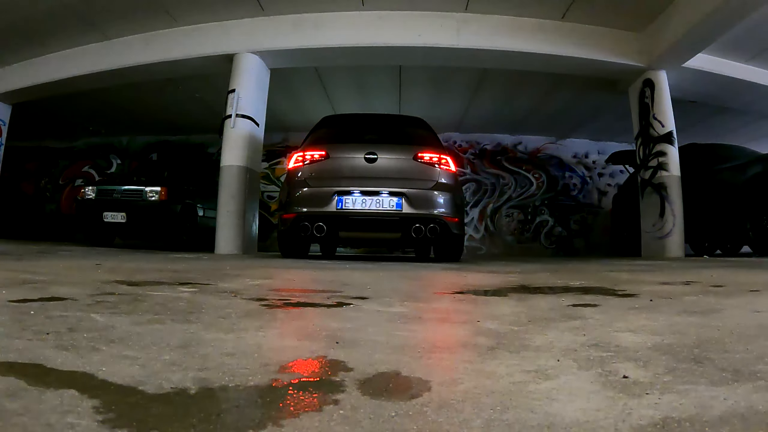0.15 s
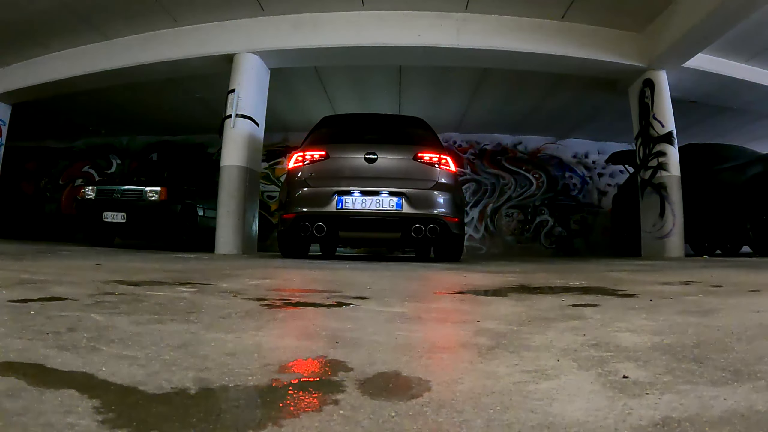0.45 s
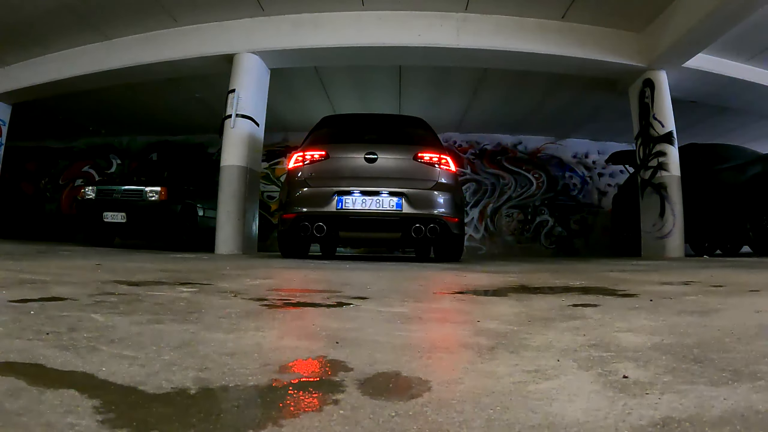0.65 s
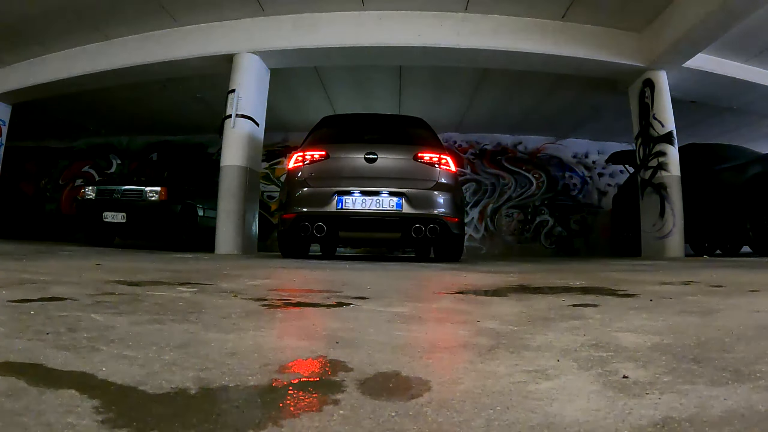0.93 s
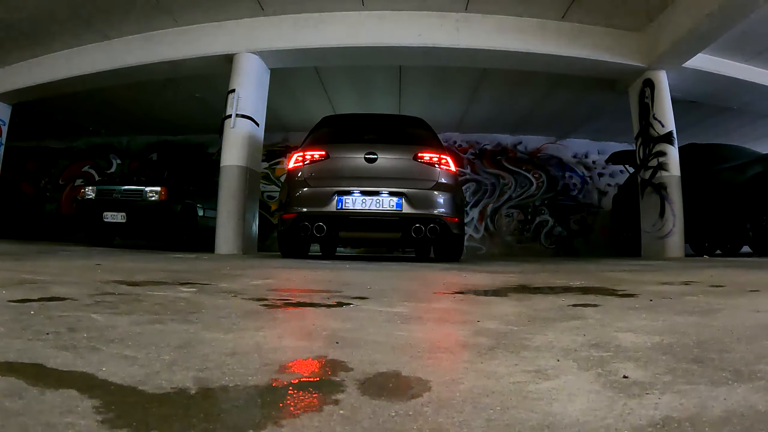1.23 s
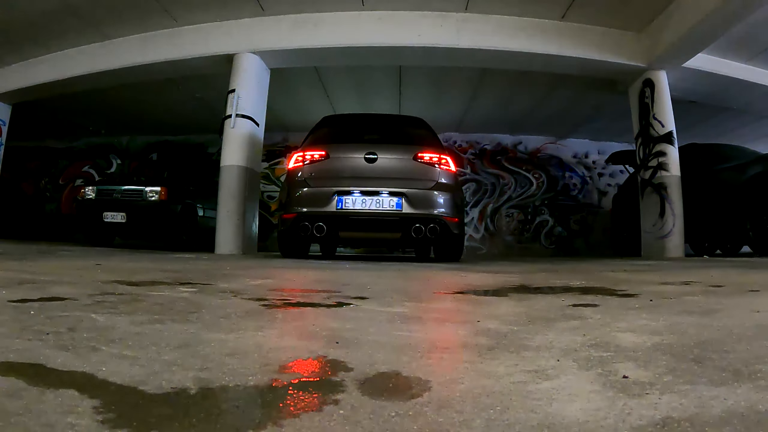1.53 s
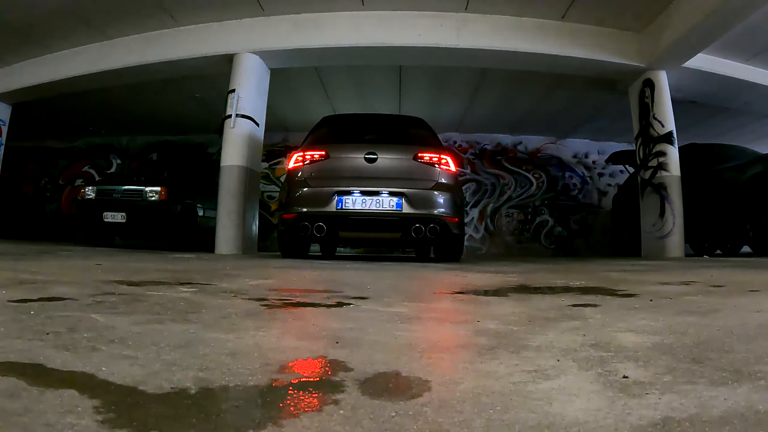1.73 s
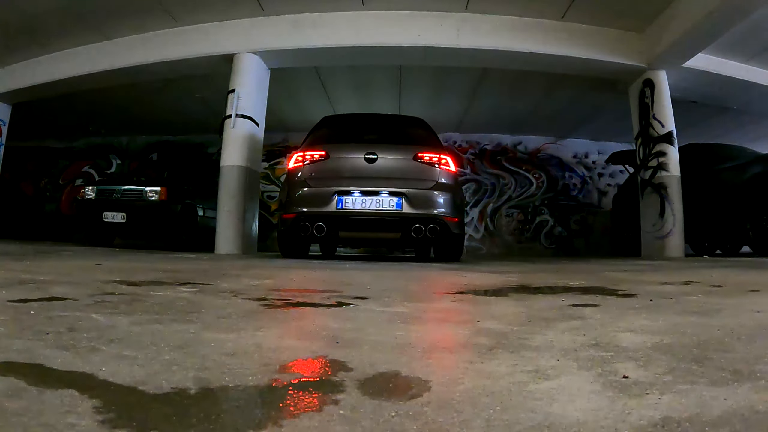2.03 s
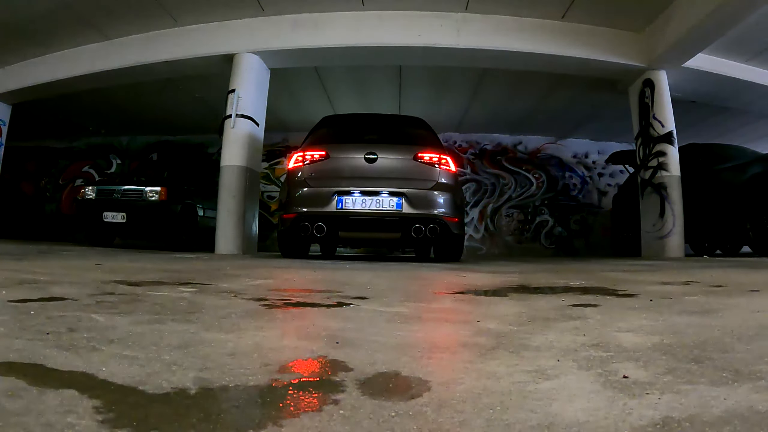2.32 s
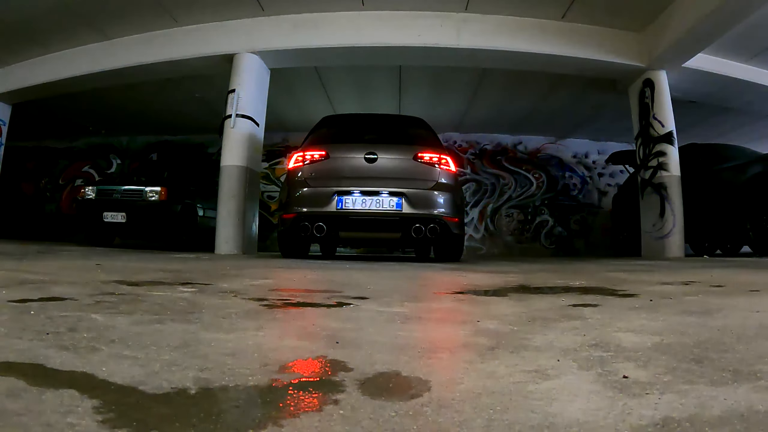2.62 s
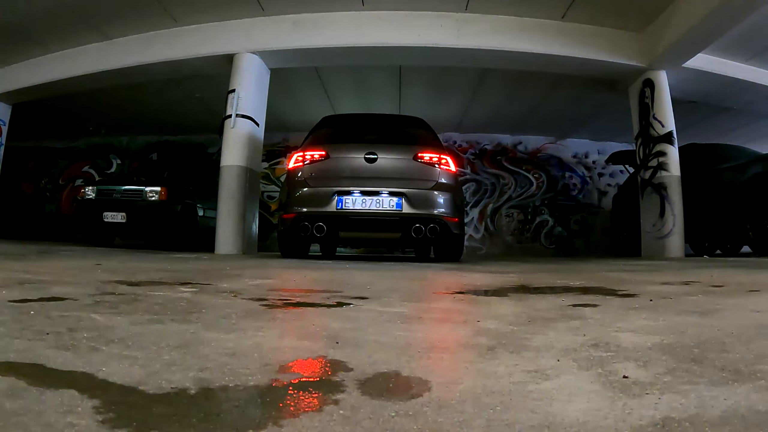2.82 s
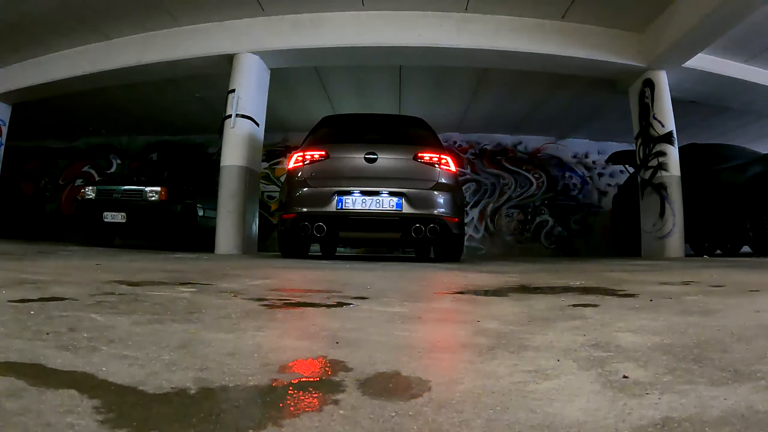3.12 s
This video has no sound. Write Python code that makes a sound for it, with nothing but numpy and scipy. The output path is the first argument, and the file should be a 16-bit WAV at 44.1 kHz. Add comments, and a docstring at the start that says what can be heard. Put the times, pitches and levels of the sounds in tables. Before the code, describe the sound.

A car engine idles with a low rumble, then revs twice, the second time higher and louder. Heard from behind the car, the exhaust barks and crackles, booming off the bare walls of a concrete garage.

```python
"""A four-cylinder car in a concrete garage, heard from behind: idle, one nudge, two revs.
Each firing sends a thump, a bark and a sharp crack out of the tailpipes; under load a gas jet spits.
Engine orders drone, the lowest boom in the room, and slugs of gas ring the silencer.
Gas rumbles, the engine bay hisses, and the bare walls give a long tail."""
import sys
import numpy as np
from scipy import signal
from scipy.fft import rfft, irfft
from scipy.io import wavfile

SR = 44100
rng = np.random.default_rng(int(sys.argv[2]) if len(sys.argv) > 2 else 0)


def inscribe(sig):
    """Save sig as 16-bit PCM at rate SR to the path in sys.argv[1].

    A 1-D sig is mono; a 2-D sig holds one channel per row.
    Samples are clipped to [-1, 1] before scaling.
    """
    pcm = np.round(np.clip(np.atleast_2d(sig).T, -1, 1) * 32767)
    wavfile.write(sys.argv[1], SR, pcm.astype(np.int16))


N = 143766
RUN_IN = SR  # samples; the engine is already idling
TIME_S = np.arange(-RUN_IN, N) / SR

# Stereo side signal: freq_hz, gain_db
SIDE_SPECTRUM = [(125, -25.5), (250, -23), (700, -7.5), (12000, -7)]
# Garage decay: freq_hz, t60_s
GARAGE_DECAY = [(100, 4.45), (600, 2.14), (1500, 2.5), (4000, 0.37), (10000, 1)]
# Engine bay hiss: time_s, level_db
HISS_LEVEL = [(0, -46.5), (.8, -45.5), (1.45, -42), (1.62, -35.5), (1.85, -41.5), (2.25, -42.5),
              (2.5, -38.5), (3.0, -38.5), (3.26, -42.5)]
# Hiss colour: freq_hz, relative_db
HISS_SPECTRUM = [(400, 12.5), (3000, 0), (5300, -2.5), (6500, -9.5), (8000, -13.5), (9000, -22),
                 (12000, -27), (15000, -57.5)]
# Gas rumble: time_s, level_db
RUMBLE_LEVEL = [(0, -45), (.8, -40), (1.45, -31), (1.65, -21), (2.6, -26), (2.77, -20), (2.95, -28),
                (3.26, -28)]
# Rumble colour: freq_hz, relative_db
RUMBLE_SPECTRUM = [(20, -16.5), (45, 3), (68, 3.5), (110, -5.5), (200, -11.5), (300, -4.5), (900, -74)]
# Garage standing waves: pitch_hz, gain_db
STANDING_WAVES = [(105, -14.5), (119, 3.5), (153, -1.5), (231, -14), (307, -7.5), (377, -10.5)]
# Lowest room mode: time_s, level_db
ROOM_MODE_LEVEL = [(1.4, -50), (1.62, -23.5), (1.85, -15.5), (2.35, -27.5), (2.6, -16), (3.26, -45.5)]
# Engine speed: time_s, firing_hz
FIRING_RATE = [(0, 32.68), (.25, 32.48), (.75, 31.34), (1.08, 36.27), (1.28, 34.39), (1.48, 35.6),
               (1.6, 48.89), (1.72, 53.68), (1.95, 48.25), (2.2, 40.95), (2.3, 42.46), (2.45, 63.76),
               (2.6, 78.95), (2.7, 76.66), (2.85, 72.07), (3.0, 64.5), (3.09, 59.5), (3.26, 56.5)]
# Firing tone: time_s, level_db
ORDER1_LEVEL = [(0, -49), (.8, -35.5), (1.5, -37), (2.25, -28.5), (2.52, -8.5), (2.63, -30.5), (2.72, -38),
                (2.88, -12), (3.0, -11.5), (3.11, -17), (3.26, -13.5)]
# Its octave: time_s, level_db
ORDER2_LEVEL = [(0, -15), (.52, -13.5), (.73, -25), (.97, -15), (1.22, -23.5), (1.35, -14.5), (1.44, -24.5),
                (1.53, -13.5), (2.25, -27.5), (2.44, -12.5), (2.58, -51), (2.77, -15.5), (2.95, -47.5),
                (3.26, -20.5)]
# Drive of drone and standing waves: time_s, level_db
DRONE_LEVEL = [(0, -34.5), (.6, -33.5), (1.2, -26), (1.5, -30), (1.7, -20), (2.2, -30.5), (2.55, -16),
               (2.85, -21.5), (3.05, -32), (3.26, -31)]
# Silencer and room response: freq_hz, gain_db
DRONE_SPECTRUM = [(95, -7.5), (128, -6.5), (200, -2), (255, -18), (290, -9), (400, -21.5), (700, -50.5)]
# Idle orders: time_s, order5_db, order10_db
IDLE_HUM = [(0, -38, -32), (.27, -33.5, -31.5), (.45, -36, -54), (.85, -30.5, -67), (1.2, -65, -70)]
# Gas slugs: start_s, level_db
CHUFFS = [(1.059, -24), (1.564, -21.5), (1.609, -18.5)]
# Exhaust pulse strength: time_s, thump_db, bark_db, crack_db
PULSE_LEVELS = [(0, -24, -39, -51.5), (.4, -28.5, -43, -64.5), (.88, -30.5, -42.5, -59.5),
                (1.12, -16.5, -36, -50), (1.42, -42, -45.5, -63), (1.5, -19, -36, -59),
                (1.58, -18, -23, -39), (1.78, -23, -24, -46), (1.95, -17.5, -38, -53.5),
                (2.1, -41.5, -54, -61), (2.28, -21.5, -38, -53.5), (2.4, -18, -20.5, -32.5),
                (2.62, -29.5, -20.5, -33.5), (2.72, -18, -23, -44.5), (2.85, -27.5, -28, -43.5),
                (3.02, -27.5, -31.5, -47), (3.26, -22.5, -40, -50)]
# Firings that pop or stumble: time_s, bark_offset_db, crack_offset_db
UNEVEN_FIRINGS = [(.172, -0.5, 4.5), (.295, 7.5, 3.5), (.482, 3.5, 8), (1.145, 9, -1), (1.539, 8.5, 11.5),
                  (1.584, 3.5, 8), (1.664, 3, 8), (1.683, -13.5, -19), (1.702, 5, 13), (1.722, 6.5, 5),
                  (1.74, -11.5, -14), (1.759, 7, 12.5), (1.779, 0, 8.5), (1.798, 4, 0.5), (1.836, 1, 13),
                  (1.936, 11, 6.5), (2.346, 4.5, 5), (2.364, 3, 4.5), (2.402, -0.5, 1.5), (2.604, -9, 6.5),
                  (2.63, 0.5, 5.5), (2.669, 3, 4), (2.682, -3, -9), (2.707, 5, 9.5)]
# Exhaust pulse colours, all four: freq_hz, relative_db
THUMP_SPECTRUM = [(50, -41.5), (85, -9.5), (115, 8.5), (160, -6.5), (200, -5.5), (255, -18.5), (315, -6),
                  (380, -15), (450, -19), (800, -61), (14000, -115)]
BARK_SPECTRUM = [(220, -14.5), (300, 0.5), (370, -7), (440, -8), (510, -9.5), (570, -2.5), (640, -1.5),
                 (750, -13.5), (895, -9), (1000, -17), (1100, -10), (1400, -29.5), (2500, -56.5),
                 (14000, -90.5)]
CRACK_SPECTRUM = [(500, 0), (1000, 4), (1350, 7.5), (1750, 5), (2350, 2), (2900, -12.5), (5500, -32.5),
                  (8000, -38.5), (12000, -43), (15000, -69)]
SPIT_SPECTRUM = [(2000, -1.5), (3500, 1), (5800, -1), (8000, -13), (12000, -37), (15000, -46.5)]


def amp(db):
    """Decibels to gain."""
    return 10 ** (np.asarray(db) / 20)


def in_time(rows):
    """A curve's columns at every sample."""
    times_s, *columns = np.transpose(rows)
    return [np.interp(TIME_S, times_s, column) for column in columns]


def at_hz(points, hz):
    """Interpolate on a log-frequency axis."""
    freq_hz, value = np.transpose(points)
    return np.interp(np.log(hz + 1e-3), np.log(freq_hz), value)


def bins_hz(size):
    """FFT bin frequencies."""
    return np.arange(size // 2 + 1) * SR / size


def convolve(x, response):
    """Causal convolution."""
    return signal.fftconvolve(x, response)[:len(x)]


def minimum_phase(spectrum, size=16384):
    """Minimum-phase impulse response of a spectrum."""
    cepstrum = irfft(np.log(amp(at_hz(spectrum, bins_hz(size)))))
    cepstrum[1:size // 2] *= 2
    cepstrum[size // 2 + 1:] = 0
    return irfft(np.exp(rfft(cepstrum)))


def colour(x, spectrum):
    """Shape a white signal, keeping its power."""
    response = minimum_phase(spectrum)
    return convolve(x, response / np.linalg.norm(response))


def spread(mid, side):
    """Stereo: alike in the bass, apart in the treble."""
    return mid + convolve(side, minimum_phase(SIDE_SPECTRUM)) * np.array([[1], [-1]])


def order(firings, k):
    """Unit-RMS sine at k times the firing rate."""
    return np.sqrt(2) * np.sin(2 * np.pi * k * firings)


def garage_tail(size=65536, delay_s=.0042, build_up_s=.0065):
    """Dense wall reflections, decaying per octave; the bass lasts longest."""
    t = np.arange(size) / SR
    white = rfft(rng.standard_normal(size))
    octave = np.round(np.log2(np.maximum(bins_hz(size), 100)))
    tail = sum(irfft(white * (octave == k)) * amp(-60 * t / at_hz(GARAGE_DECAY, 2 ** k))
               for k in np.unique(octave))
    onset = np.clip((t - delay_s) / build_up_s, 0, 1)
    return tail * onset / np.sqrt(SR / 10)


def rumble_and_hiss():
    """Turbulent gas rumbles; the engine bay hisses."""
    (rumble_db,), (hiss_db,) = in_time(RUMBLE_LEVEL), in_time(HISS_LEVEL)
    mid, side = [amp(rumble_db) * colour(low, RUMBLE_SPECTRUM)
                 + amp(hiss_db) * colour(high, HISS_SPECTRUM)
                 for low, high in rng.standard_normal((2, 2, len(TIME_S)))]
    return spread(mid, side)


def standing_waves(firings, width_hz=2.35):
    """Passing low orders excite the garage's standing waves, which ring on."""
    level_db, = in_time(DRONE_LEVEL)
    drive = amp(level_db) * sum(order(firings, k) for k in range(2, 6))
    radius = np.exp(-np.pi * width_hz / SR)
    waves = 0
    for hz, db in STANDING_WAVES:
        feedback = [1, -2 * radius * np.cos(2 * np.pi * hz / SR), radius ** 2]
        waves += amp(db) * signal.lfilter([1, 0, -1], feedback, drive)
    return (1 - radius) * waves


def room_mode(pitch_hz=66.8):
    """The garage's lowest resonance: a sine that swells with each rev."""
    level_db, = in_time(ROOM_MODE_LEVEL)
    return np.sqrt(2) * amp(level_db) * np.sin(2 * np.pi * pitch_hz * TIME_S)


def boom(firings):
    """Orders 1 and 2; their level curves swell near the room's resonance."""
    (first_db,), (second_db,) = in_time(ORDER1_LEVEL), in_time(ORDER2_LEVEL)
    return amp(first_db) * order(firings + .25, 1) - amp(second_db) * order(firings, 2)


def idle_hum(firings):
    """Orders 4 and 10 give way to order 5 as the idle sags."""
    fifth_db, tenth_db = in_time(IDLE_HUM)
    pair = order(firings, 10) + amp(5) * order(firings, 4)
    return amp(fifth_db) * order(firings, 5) + amp(tenth_db) * pair


def drone(firings, firing_hz):
    """Orders 3 to 12 sweep through the silencer and room resonances."""
    level_db, = in_time(DRONE_LEVEL)
    orders = sum(amp(at_hz(DRONE_SPECTRUM, k * firing_hz)) * order(firings, k) for k in range(3, 13))
    return amp(level_db) * orders


def chuffs(modes_hz=(334.2, 370.7), t60_s=.34):
    """Heavy slugs of gas ring the silencer's two modes."""
    slugs = np.zeros(len(TIME_S))
    for start_s, db in CHUFFS:
        slugs[RUN_IN + int(start_s * SR)] = amp(db)
    t = np.arange(SR) / SR
    ring = amp(-60 * t / t60_s) * sum(np.sin(2 * np.pi * hz * t) for hz in modes_hz)
    return convolve(slugs, ring)


def puffs(firings, spectrum, level_db, pop_db, scatter_db, noise_share, puff_s, jitter_s):
    """One pressure pulse per firing, then a short burst of turbulence."""
    starts = np.flatnonzero(np.diff(np.floor(firings)) > 0)
    level_draw, time_draw = rng.standard_normal((len(starts), 2)).T
    pulse_db = level_db[starts] + scatter_db * level_draw
    for (time_s, *_), offset_db in zip(UNEVEN_FIRINGS, pop_db):
        nearest = np.argmin(abs(TIME_S[starts] - time_s))
        pulse_db[nearest] = level_db[starts[nearest]] + offset_db
    jittered = np.clip(starts + (jitter_s * SR * time_draw).astype(int), 0, len(TIME_S) - 1)
    clicks = np.zeros(len(TIME_S))
    clicks[jittered] = amp(pulse_db) * np.sqrt(np.gradient(starts))  # power independent of rate
    decay = np.exp(-2 / (puff_s * SR))
    envelope = np.sqrt(signal.lfilter([1 - decay], [1, -decay], clicks ** 2 + 1e-18))
    burst = envelope * rng.standard_normal(len(TIME_S))
    return colour(np.sqrt(noise_share) * burst - np.sqrt(1 - noise_share) * clicks, spectrum)


def exhaust(firings, spit_lag_s=.0016):
    """Tailpipe thump, bark and crack, direct and off the walls; a gas jet spits after each crack."""
    thump_db, bark_db, crack_db = in_time(PULSE_LEVELS)
    _, bark_pop_db, crack_pop_db = np.transpose(UNEVEN_FIRINGS)
    thump = puffs(firings, THUMP_SPECTRUM, thump_db - 1, .1 * bark_pop_db,
                  scatter_db=.55, noise_share=.03, puff_s=.012, jitter_s=.00005)
    bark = puffs(firings, BARK_SPECTRUM, bark_db, bark_pop_db,
                 scatter_db=1.1, noise_share=.4, puff_s=.0081, jitter_s=.0001)
    crack = puffs(firings, CRACK_SPECTRUM, crack_db, crack_pop_db,
                  scatter_db=1.1, noise_share=.25, puff_s=.004, jitter_s=.0001)
    delayed = np.interp(TIME_S - spit_lag_s, TIME_S, firings)
    spit_db = 1.27 * crack_db - 7.5  # grows faster than the crack: heard only under load
    spit = puffs(delayed, SPIT_SPECTRUM, spit_db, 1.53 * crack_pop_db,
                 scatter_db=2.5, noise_share=1, puff_s=.0049, jitter_s=.0011)
    to_walls = amp(-3.5) * thump + amp(-2.5) * bark + amp(-8) * crack
    walls = spread(convolve(to_walls, garage_tail()), convolve(to_walls, garage_tail()))
    return thump + bark + crack + spit + walls


def scene(first_firing_s=.0196):
    """The running count of firings times the pulses and orders."""
    firing_hz, = in_time(FIRING_RATE)
    firings = np.cumsum(firing_hz) / SR
    firings -= np.interp(first_firing_s, TIME_S, firings)
    room = standing_waves(firings) + room_mode()
    tones = boom(firings) + idle_hum(firings) + drone(firings, firing_hz)
    return (exhaust(firings) + chuffs() + tones + room + rumble_and_hiss())[:, RUN_IN:]


def record(dry, ceiling=1.2, cutoff_hz=14200):
    """Soft clip, then low-pass."""
    lowpass = signal.cheby2(12, 70, cutoff_hz, fs=SR, output="sos")
    return signal.sosfilt(lowpass, ceiling * np.tanh(dry / ceiling))


dry = scene()
out = record(dry)
inscribe(out)
```